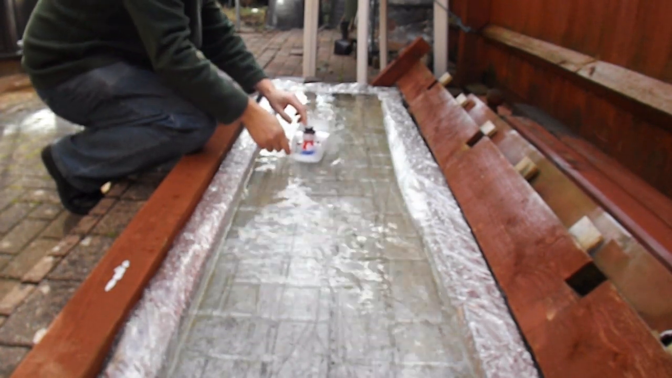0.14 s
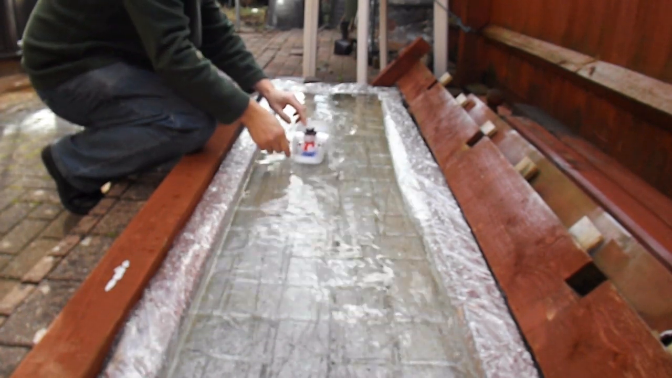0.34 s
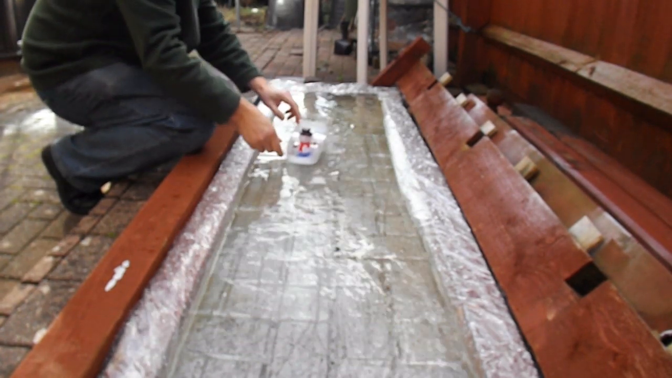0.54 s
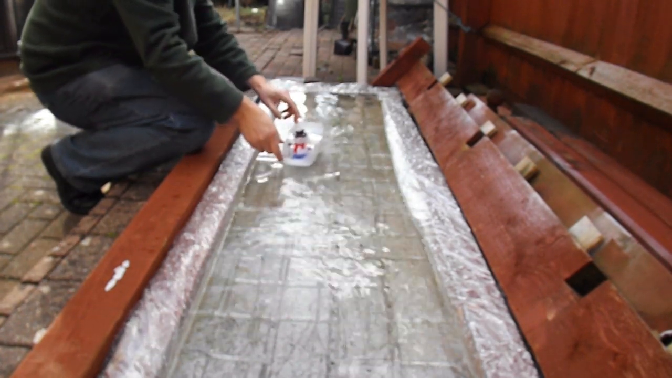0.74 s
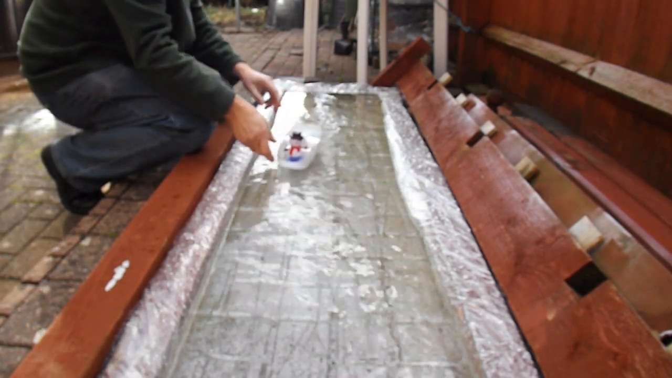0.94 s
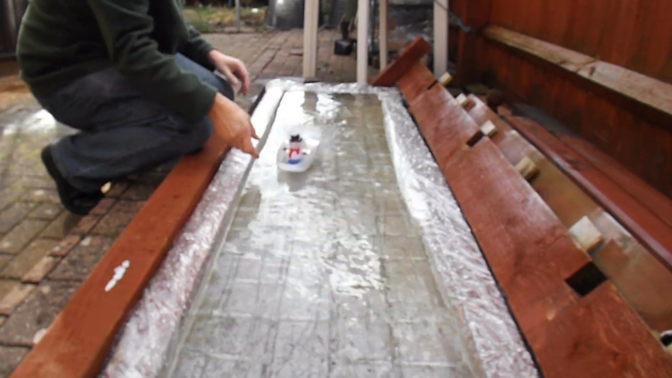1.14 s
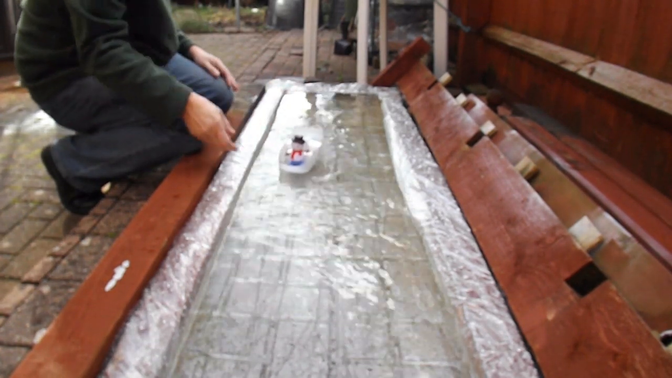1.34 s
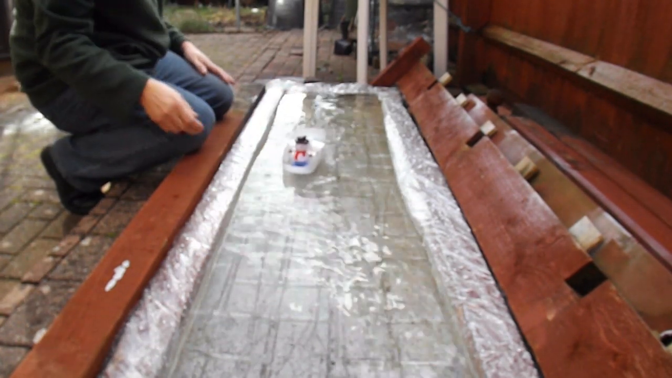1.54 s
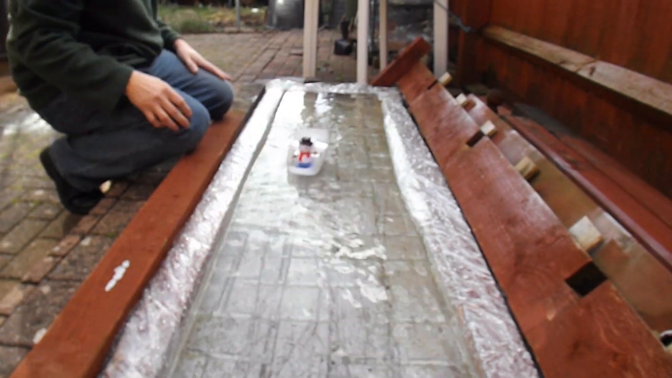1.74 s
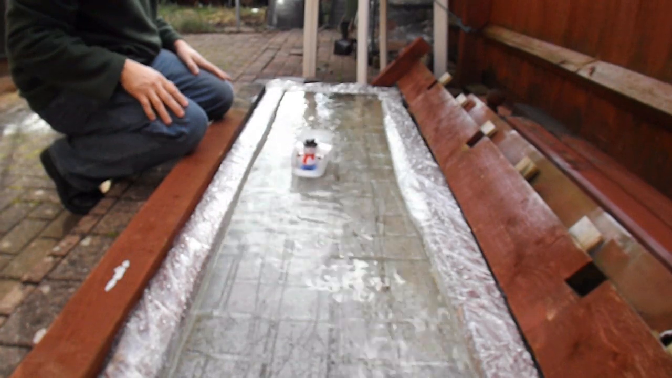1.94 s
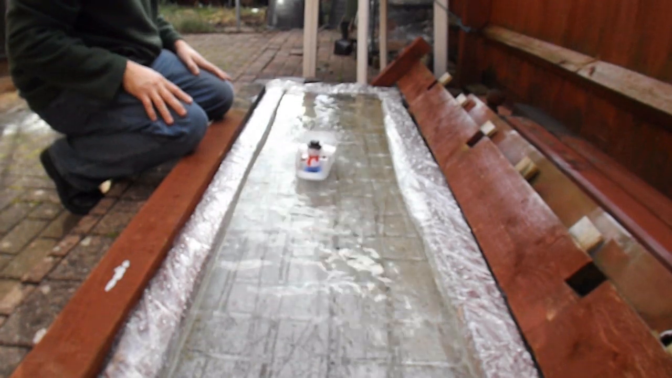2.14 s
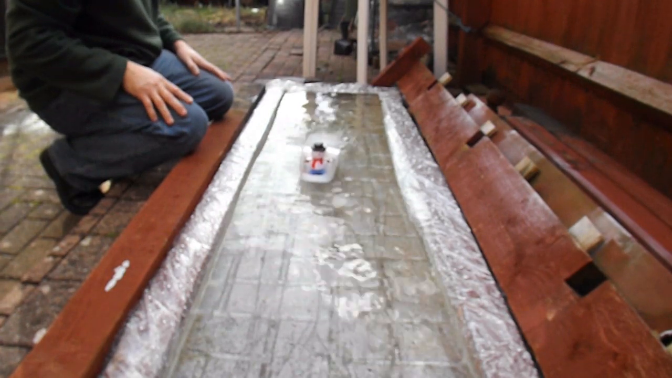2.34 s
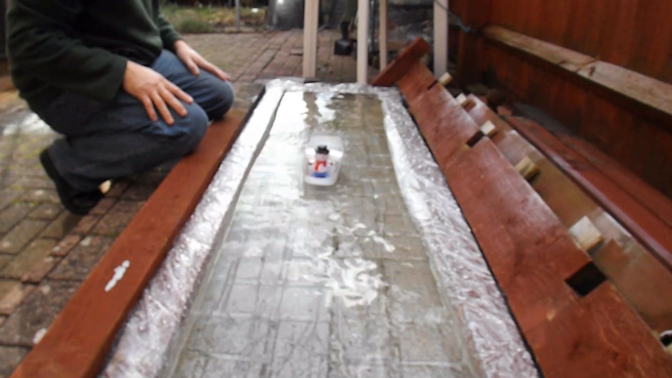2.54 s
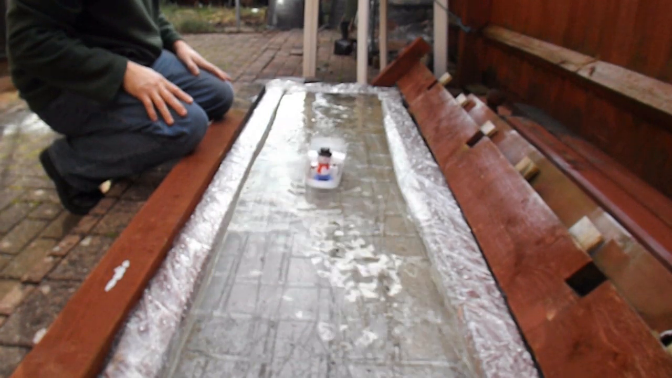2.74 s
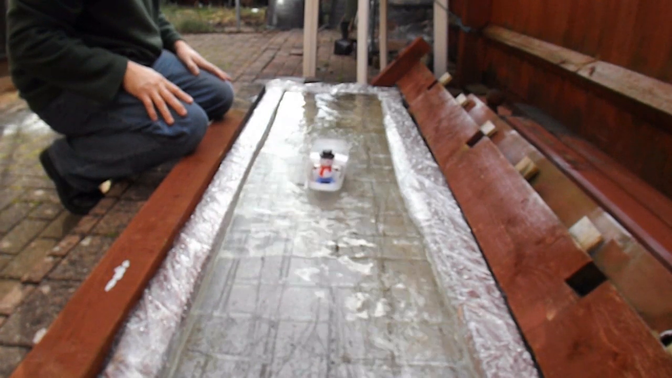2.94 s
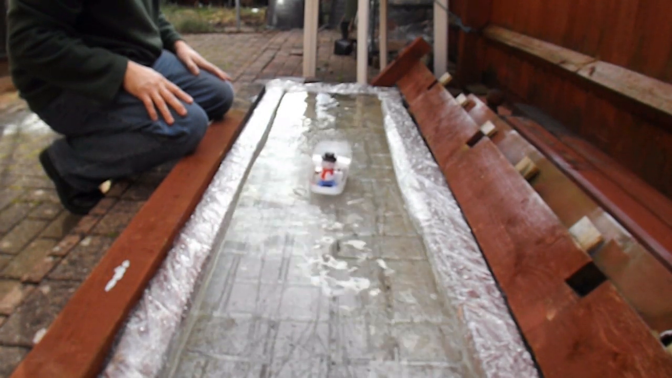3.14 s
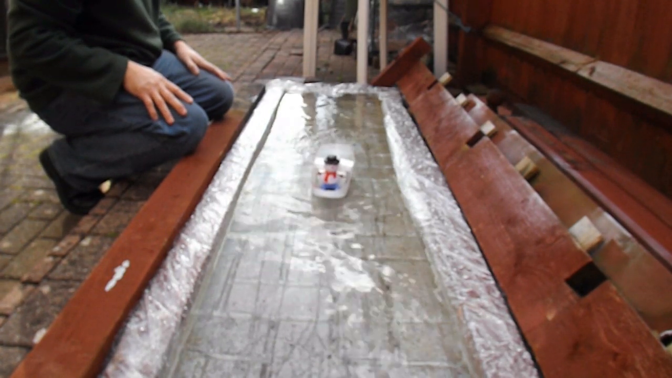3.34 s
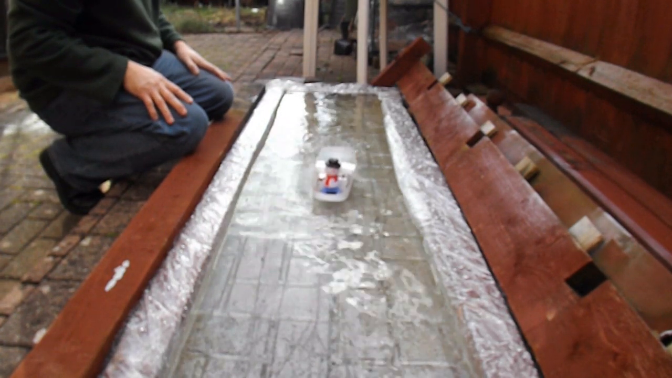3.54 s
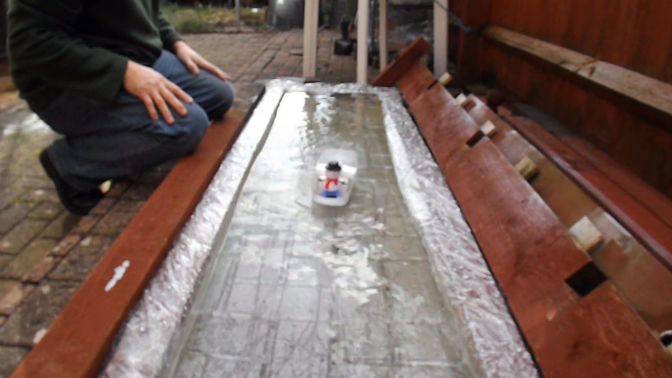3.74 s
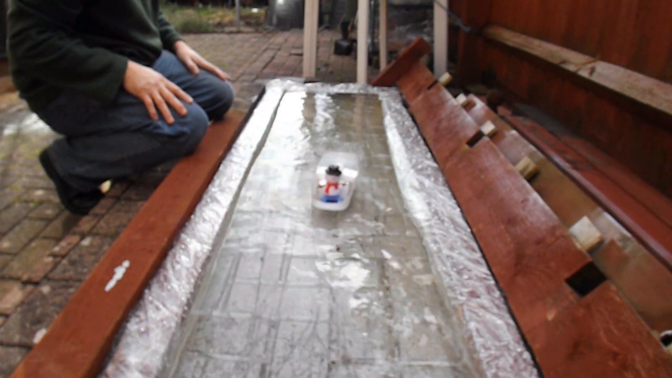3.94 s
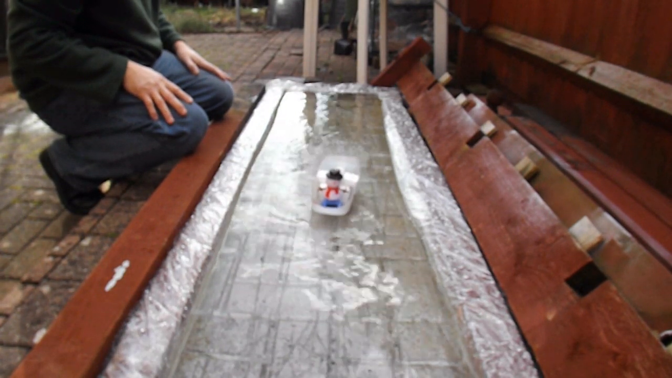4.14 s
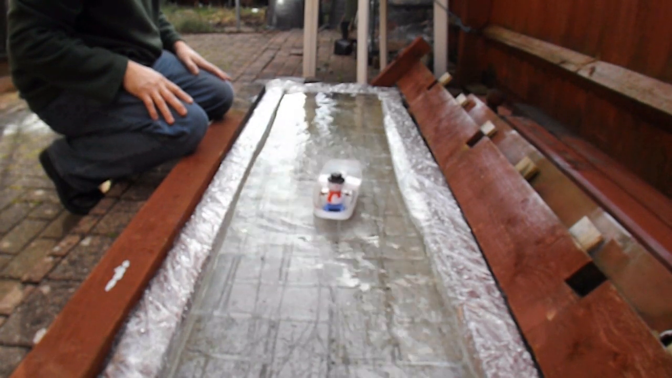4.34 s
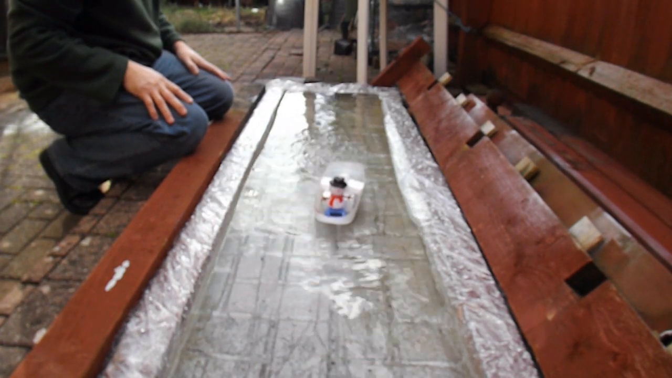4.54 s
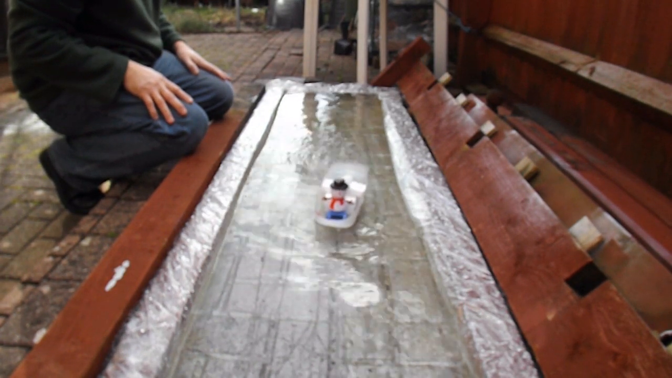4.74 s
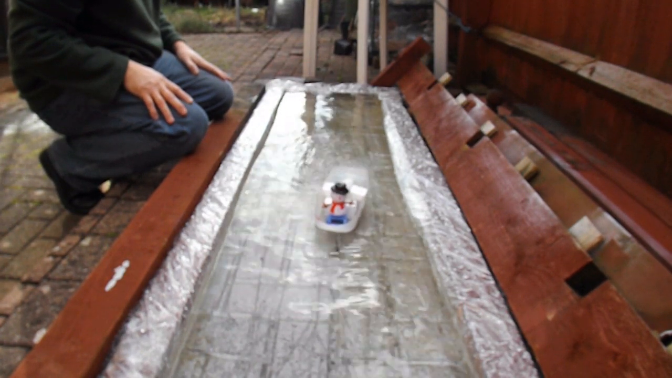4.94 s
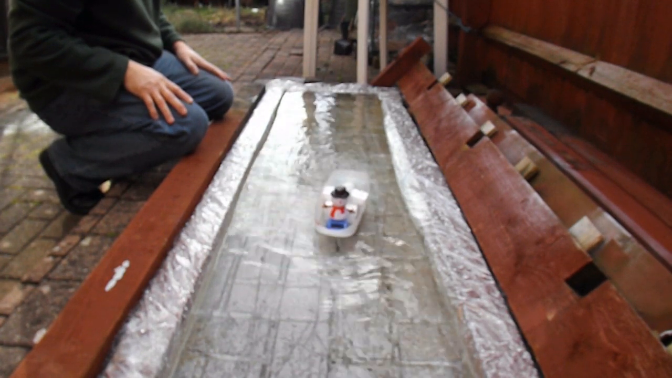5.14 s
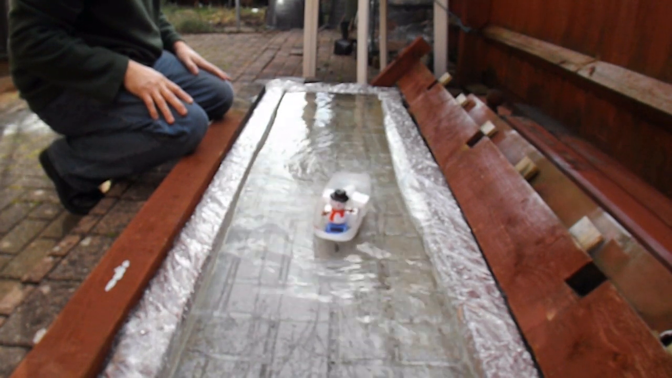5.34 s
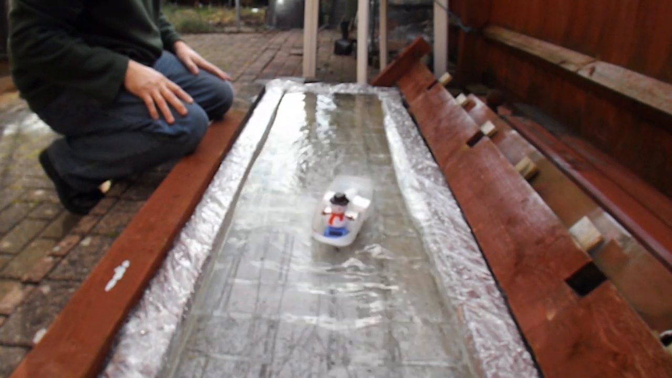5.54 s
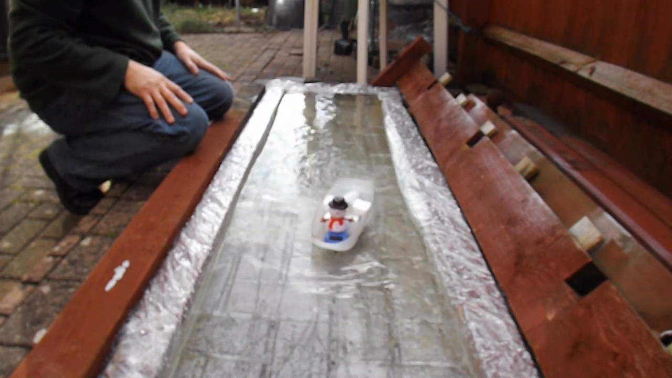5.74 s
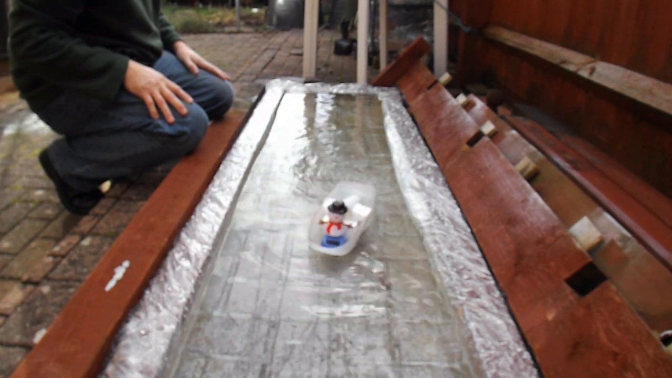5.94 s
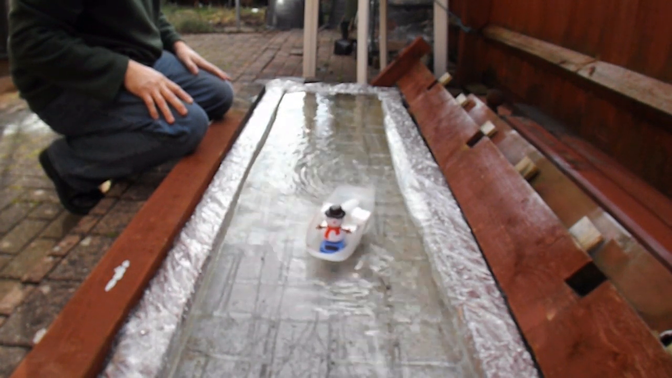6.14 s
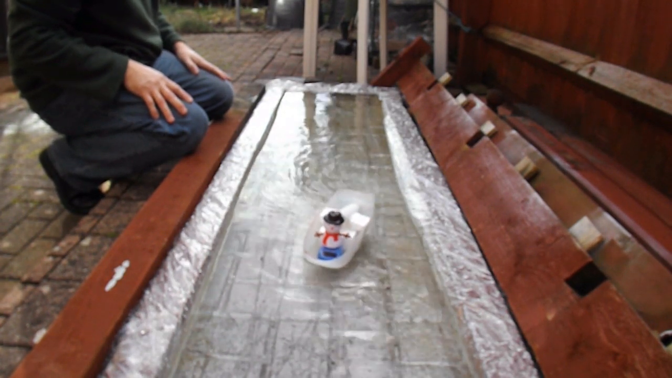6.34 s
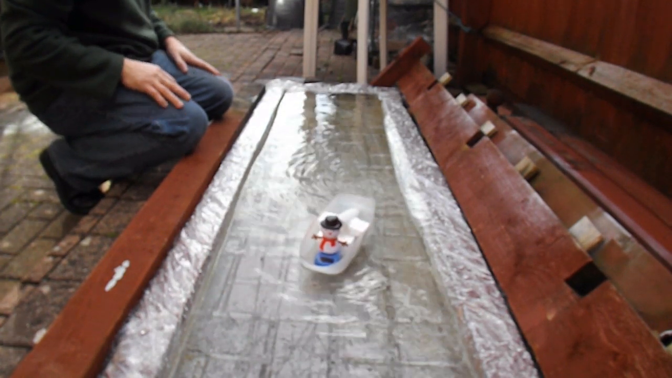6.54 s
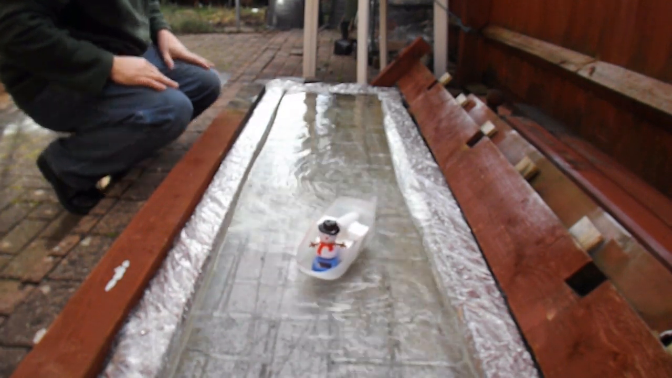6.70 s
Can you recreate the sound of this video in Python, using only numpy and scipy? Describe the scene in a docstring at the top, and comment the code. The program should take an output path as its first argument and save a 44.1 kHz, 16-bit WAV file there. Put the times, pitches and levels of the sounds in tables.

```python
"""A shallow outdoor trough, where an electric toothbrush drives a toy boat that slowly comes nearer.
Its drive knocks at both ends of each stroke: the hull hums at multiples of the stroke rate (additive tones),
its plastic clatters and rattles (clicks ringing many modes), and the shaken water fizzes (modulated noise).
Wind, made of turbulent noise and short pressure swings, buffets the microphone, then dies to a few soft puffs."""
import sys
import numpy as np
from scipy import signal
from scipy.fft import rfft, irfft
from scipy.io import wavfile

SR = 44100
rng = np.random.default_rng(int(sys.argv[2]) if len(sys.argv) > 2 else 0)


def generate_wav(signal):
    """Clip the signal to [-1, 1] and save it as 16-bit WAV at the path in sys.argv[1]."""
    frames = np.transpose(np.atleast_2d(signal))
    scaled = np.clip(frames, -1, 1) * 32767
    pcm = np.round(scaled).astype(np.int16)
    wavfile.write(sys.argv[1], SR, pcm)


N = 302967
TIME = np.arange(N) / SR  # seconds
BINS = np.fft.rfftfreq(N, 1 / SR)  # Hz


def amp(db):
    """Logarithmic level: decibels to gain."""
    return 10 ** (np.asarray(db) / 20)


def unit(x):
    """Normalisation: scales to rms 1."""
    return x / np.sqrt(np.mean(x ** 2) + 1e-20)


def curve(rows, axis=1):
    """Linear interpolation: one column of a time table at every sample."""
    rows = np.asarray(rows)
    return np.interp(TIME, rows[:, 0], rows[:, axis])


def read(points, hz):
    """Spectral envelope: interpolates a spectrum table on a log-frequency axis."""
    f, value = np.transpose(points)
    return np.interp(np.log(hz + 1), np.log(f + 1), value)


def colour(x, points):
    """Linear filtering: weights the spectrum of x by a table, then scales to rms 1."""
    return unit(irfft(rfft(x) * amp(read(points, BINS)), N))


def noise():
    """White noise: equal power at all frequencies."""
    return rng.standard_normal(N)


def drift(hz):
    """Low-passed noise: a slow random curve of rms 1, up to about hz."""
    return unit(irfft(rfft(noise()) * np.exp(-(BINS / hz) ** 2), N))


def held(start, length, ramp_s):
    """Trapezoidal envelope: rises to 1, holds and falls to 0, half way up at start and at start + length."""
    since_start = TIME - start
    until_end = start + length - TIME
    return np.clip(.5 + np.minimum(since_start, until_end) / ramp_s, 0, 1)


def scatter(x, ring_s):
    """Modal density: spreads each click over a dense, nearly colourless ring of many modes."""
    t = np.arange(2048) / SR
    ring = rfft(rng.standard_normal(len(t)) * np.exp(-t / ring_s))
    flattened = unit(irfft(ring / abs(ring) ** 0.84))
    return signal.oaconvolve(x, flattened / np.sqrt(len(t)))[:N]


# moments when extra load drags the drive down:
# start_s [s], length_s [s], speed_lost [strokes a second]
DRAGS = [(0.374, 0.13, 0.62), (0.6, 0.3, 2.3), (0.659, 0.14, 0.86), (1.742, 0.092, 0.94),
         (2.07, 0.14, 1.04), (2.619, 0.19, 1.05), (3.856, 0.056, 0.65), (4.469, 0.058, 1.01),
         (4.573, .17, 0.87), (4.93, 0.16, 0.27), (5.186, .21, 1.18), (6.148, 0.073, 0.22),
         (6.421, 0.19, 0.22)]


def drag(ramp_s=0.054):
    """Loading of a motor: strokes a second lost, with a ramp while the drive slows or recovers."""
    return sum(lost * held(start, length, ramp_s) for start, length, lost in DRAGS)


# speed of the drive under its usual load: time_s [s], speed [strokes a second]
USUAL_SPEED = [(0, 88.5), (.17, 90.4), (.33, 90.6), (1.01, 90.8), (1.08, 89.6), (1.32, 89.6), (1.46, 89),
               (1.6, 89.15), (1.75, 88.5), (2.05, 88.5), (2.33, 88.9), (2.6, 88.8), (2.8, 89.7),
               (3.05, 88.95), (3.56, 89.55), (3.89, 88.7), (4.11, 90.1), (4.36, 89.45), (4.87, 89.55),
               (5.15, 89.25), (5.46, 89.65), (5.6, 89.25), (6.19, 89.4), (6.37, 89.9), (6.87, 89.7)]


def speed():
    """Rate of the periodic source: the usual strokes a second, less every drag."""
    return curve(USUAL_SPEED) - drag()


def strain(free_hz=89.0, sag_hz=4.0):
    """Load read from speed: 0 when the drive runs freely, 1 when the load has slowed it by sag_hz."""
    return np.clip((free_hz - speed()) / sag_hz, 0, 1)


# growth of the hull's sound as the boat floats free and nears: time_s [s], gain_db [dB]
NEARNESS = [(0, -7), (1.5, -7), (2.3, -6), (2.9, -4), (4.2, -4), (5.5, -3.5), (6.87, -1)]


def nearness_db():
    """Level against distance: the gain rises as the boat comes nearer."""
    return curve(NEARNESS)


# one tone of hull or casing rings out or drops away for a while as the boat rocks:
# start_s [s], length_s [s], order [multiple of the stroke rate], level_db [dB, before any wander]
SWELLS = [(0.05, 0.19, 21, -43), (.1, 0.66, 17, -50.5), (0.267, 0.25, 21, -40.5), (0.472, 0.13, 24, -49.5),
          (.52, .14, 22, -47.5), (0.708, 0.26, 11, -45.5), (0.754, 0.18, 21, -42), (.88, 0.99, 22, -49.5),
          (1.33, 0.14, 17, -48), (1.368, 0.63, 11, -49.5), (1.617, 0.54, 17, -47.5), (2.033, 0.34, 11, -44),
          (2.276, 0.31, 11, -46.5), (2.47, 0.54, 21, -46), (2.59, 0.23, 11, -45), (2.6, .85, 19, -50.5),
          (2.619, 0.15, 45, -48), (2.786, 1.4, 22, -45.5), (2.798, 0.48, 55, -55), (3.44, 0.49, 54, -51),
          (3.48, 0.43, 17, -47.5), (3.579, 0.47, 11, -48), (3.791, 1.1, 16, -51.5), (4.053, 0.74, 22, -45),
          (4.062, 0.51, 21, -46), (4.342, 1.4, 24, -50), (5, 1.02, 22, -45), (5.45, 1.3, 62, -54.5),
          (5.001, 1.31, 14, -52), (5.15, 1.115, 43, -52), (5.15, 0.84, 45, -55), (5.799, 1.034, 12, -52),
          (5.248, 0.17, 24, -45.5), (5.384, 1.89, 17, -45), (5.45, 0.92, 54, -54), (6.03, .21, 16, -51),
          (6.248, 0.72, 21, -44), (6.25, 0.75, 41, -51), (6.25, 0.57, 22, -61.5), (6.25, 0.63, 19, -74),
          (6.299, 0.68, 7, -55), (6.3, .76, 9, -50.5)]


def swelled(order, db, wander_db):
    """Selective resonance: one tone's level is replaced by that of its swells while they last."""
    for start, length, swelling_order, swell_db in SWELLS:
        if swelling_order == order:
            db = db + held(start, length, ramp_s=.07) * (swell_db + wander_db - db)
    return db


def tones(turns, partials, phase_spread):
    """Harmonic series: multiples of the stroke rate, each starting at a random phase."""
    out = np.zeros(N)
    for order, db in partials:
        phase = phase_spread * rng.standard_normal()  # radians
        out += amp(db) * np.cos(2 * np.pi * order * turns + phase)
    return np.sqrt(2) * out  # each level is an rms level


# the hull's usual tones: order [multiple of the stroke rate], level_db [dB, before nearness and strain]
HUM = [(4, -61.5), (6, -50.5), (7, -46), (8, -60), (9, -53.5), (10, -54.5), (11, -56), (12, -55.5),
       (14, -57), (15, -60), (16, -55.5), (17, -49), (18, -54.5), (19, -50), (20, -52), (21, -48.5),
       (22, -47.5), (23, -57), (24, -51.5), (25, -54), (26, -60)]


def hull_hum(turns, wander_db=2.5, ringing_wander_db=1.0, flutter=0.053, strained_db=4.0):
    """Forced vibration: low tones swell under strain and waver with rocking, less while one rings out."""
    near_db, partials = nearness_db(), []
    for order, usual_db in HUM:
        rocking = drift(6.9)
        db = usual_db + near_db + order / 20 * (wander_db * rocking + strained_db * strain())
        near_1khz = np.exp(-((order - 11) / 1.5) ** 2)
        ripple_db = 3 * near_1khz * (drift(25) - .5)  # ripples shake the tones near 1 kHz
        partials.append((order, swelled(order, db, ringing_wander_db * rocking) + ripple_db))
    hum = tones(turns, partials, phase_spread=2.5)
    return hum * (1 + flutter * (1 + strain()) * drift(46))


def knock(turns, jitter_s, uneven):
    """Impulse train: one band-limited click a stroke, each a little early or late, weak or strong."""
    at_s = np.interp(np.arange(1, int(turns[-1])), turns, TIME)
    late, size = rng.standard_normal((len(at_s), 2)).T
    at = (at_s + jitter_s * late) * SR
    taps = at.astype(int)[:, None] + np.arange(-8, 9)
    # a sinc places each click between samples
    clicks = np.sinc(taps - at[:, None]) * (1 + uneven * size)[:, None]
    return np.bincount(np.clip(taps, 0, N - 1).ravel(), clicks.ravel(), N)


def chatter(turns, spectrum, jitter_s, ring_s, loose, back_db, creep, dragged_rasp=0.35):
    """Impact and friction: out and back knocks ring the plastic; drag makes the contact rasp and slip."""
    out = np.zeros(N)
    # the contact moves this many radians a second for each stroke a second lost
    slip = 14.216 * np.cumsum(drag()) / SR
    for stroke, db in ((turns, 0), (turns + .5, back_db)):
        clicks = knock(stroke, jitter_s, uneven=0.064)
        contact = slip + creep * drift(7.1)
        one_seat = np.cos(contact) * scatter(clicks, ring_s)
        other_seat = np.sin(contact) * scatter(clicks, ring_s)
        out += amp(db) * (one_seat + other_seat)
    rasp = noise() * (.5 + np.exp(-(turns % 1) / 2.7))
    share = np.clip(loose + dragged_rasp * drag(), 0, .8)
    return np.sqrt(1 - share ** 2) * colour(out, spectrum) + share * colour(rasp, spectrum)


# level of the knocks, which dips briefly around the hardest early buffets: time_s [s], clatter_db [dB],
# rattle_db [dB], both before wavering
KNOCKS = [(0, -54, -51), (.09, -43, -40.5), (.27, -47, -44), (.33, -41.5, -39.5), (.55, -45.5, -40),
          (.72, -46, -38.5), (.9, -41.5, -40.5), (1.08, -45, -41.5), (1.7, -43, -41), (2.41, -45.5, -40.5),
          (2.62, -42, -38.5), (3.26, -45, -42), (3.55, -41, -39.5), (4.05, -43.5, -41), (4.46, -40, -39),
          (4.92, -44.5, -42.5), (5.24, -41, -39), (5.55, -42.5, -41), (6.7, -41, -38)]
# colour of the hull's clatter: frequency_hz [Hz], relative_level_db [dB]
CLATTER = [(1900, -23), (2350, -4.5), (2750, -2.5), (3150, -10.5), (3550, -1), (4050, 1.5), (4450, -7),
           (4800, -1), (5200, -5), (5800, 0), (6300, -10), (7000, -80)]
# colour of the bright rattle: frequency_hz [Hz], relative_level_db [dB]
RATTLE = [(5400, -49), (6100, -2.5), (6600, -3), (6950, 1), (7300, -3), (7750, -2), (8300, -2.5),
          (9000, -10.5), (10000, -15), (12000, -25.5), (15500, -50)]


def clatter_and_rattle(turns, flicker_db=0.6):
    """Impact excitation: each knock rings the hull, and a looser, brighter rattle that also flutters."""
    clatter = chatter(turns, CLATTER, jitter_s=.000003, ring_s=.0042, loose=.04, back_db=-5, creep=.7)
    rattle = chatter(turns, RATTLE, jitter_s=.00001, ring_s=.005, loose=.18, back_db=-3.5, creep=1.1)
    rattle_db = curve(KNOCKS, axis=2) + flicker_db * drift(35)
    return amp(curve(KNOCKS)) * clatter + amp(rattle_db) * rattle


def resonate(x, hz, width_hz):
    """Resonance by heterodyning: shifts the curve hz to zero, low-passes, and shifts back."""
    turn = np.exp(2j * np.pi * np.cumsum(hz) / SR)
    r = np.exp(-np.pi * width_hz / SR)
    return 2 * (turn * signal.lfilter([1 - r], [1, -r], x / turn)).real


# the casing's brightest resonance, which slides as it shifts in its mount:
# time_s [s], centre_hz [Hz, before wobble], relative_level_db [dB]
SIZZLE = [(0.05, 7600, -49), (0.1, 7560, -55), (0.26, 7600, -50), (0.37, 7460, -44.5), (1.1, 7500, -41),
          (2.5, 7490, -42.5), (2.6, 7543, -36.5), (3.16, 7330, -39), (4.27, 7427, -37), (4.73, 7500, -40.5),
          (6.35, 7620, -37.5), (6.67, 7750, -35), (6.82, 7540, -40)]


def sizzle(turns, level_db=-1.5, width_hz=500, wobble_hz=130, flicker_db=0.9):
    """Moving resonance: loose chatter sings in one bright casing mode that slides, wobbles and flickers."""
    centre = curve(SIZZLE) + wobble_hz * drift(9.4)
    db = curve(SIZZLE, axis=2) + level_db + flicker_db * drift(8.1)
    rasp = chatter(turns, RATTLE, jitter_s=.000008, ring_s=.005, loose=.4, back_db=-3, creep=1.4)
    once = resonate(rasp, centre, width_hz)
    return amp(db) * unit(resonate(once, centre, width_hz))


# thin whine of the casing: order [multiple of the stroke rate], relative_level_db [dB]
WHINE = [(38, -59), (39, -58), (40, -61.5), (41, -79), (43, -65), (45, -59), (46, -60), (54, -66),
         (55, -68), (62, -55.5), (74, -52.5), (75, -59)]


def whine(turns, wander_db=2.0, level_db=1.5, damped_db=5):
    """Damped harmonics: high casing tones trade places as it shifts in its mount; strain damps them."""
    near_db = nearness_db() + level_db - damped_db * strain()
    partials = [(order, swelled(order, db + near_db, 0) + wander_db * drift(13.0)) for order, db in WHINE]
    return tones(turns, partials, phase_spread=2.2)


# colour of the water stirred by the hull: frequency_hz [Hz], relative_level_db [dB]
WATER = [(200, -48), (450, -8), (650, -2), (1000, 2.5), (1400, -2.5), (2100, -2.5), (2800, -14), (5000, -5),
         (10000, -31.5)]


def water(turns, level_db=-45.5, churn=0.034):
    """Amplitude-modulated noise: ripples and tiny splashes thrown up in time with the stroke."""
    lapping_db = .6 * drift(8)
    stir_db = lapping_db + 0.015 * nearness_db() + 4.9 * strain()
    stir = (1 + churn * np.cos(2 * np.pi * turns)) * amp(stir_db)
    return amp(level_db) * colour(noise() * stir, WATER)


# the breeze, which drops suddenly and then dies away: time_s [s], relative_level_db [dB]
BREEZE_FORCE = [(0, -40.5), (1.36, -37.5), (1.47, -63), (4.3, -74), (6.87, -112)]
# gusts on top of the breeze: peak_s [s], relative_level_db [dB], half_length_s [s, to 1/e]
GUSTS = [(0.27, -38.5, 0.031), (0.786, -39, 0.092), (1.153, -36.5, 0.15), (1.32, -45, 0.1),
         (1.538, -45.5, 0.031), (1.767, -62, 0.028), (2.065, -59, 0.023), (2.455, -61, 0.12),
         (2.734, -48, 0.054), (3.145, -57, 0.056), (3.497, -60, 0.013), (3.88, -60, 0.024),
         (4.078, -59, 0.059)]


def wind_force():
    """Superposition: the breeze plus a bell-shaped swell for each gust, as a gain."""
    swells = sum(amp(db) * np.exp(-((TIME - s) / half_s) ** 2) for s, db, half_s in GUSTS)
    return amp(curve(BREEZE_FORCE)) + swells


# colour of a light gust: frequency_hz [Hz], relative_level_db [dB]
LIGHT_GUST = [(20, -12), (60, -5.5), (120, -3.5), (220, -3.5), (350, -8.5), (600, -38), (1500, -52),
              (5000, -70)]
# colour of a strong gust: frequency_hz [Hz], relative_level_db [dB]
STRONG_GUST = [(20, -29), (70, -7), (160, 4), (350, 5), (600, -4), (1000, -8), (1600, -12), (3000, -27.5),
               (12000, -38)]


def wind(level_db=2.0, lumpy_db=6.5, strong_db=-33):
    """Turbulence noise: lumpy and brighter the harder it blows, until the air falls still."""
    db = 20 * np.log10(wind_force())
    strong = np.clip(1.5 + (db - strong_db) / 16, 0, 1)
    eddies = noise() * amp(lumpy_db * np.tanh(drift(116)))
    blend = (1 - strong) * colour(eddies, LIGHT_GUST) + strong * colour(eddies, STRONG_GUST)
    return amp(db + level_db) * blend


def small_eddies(above_db=0, spread_db=3, cycles=0.63, least_db=-45, count=280, per_s=37, middle_hz=520):
    """Poisson process: random rows like those of BUFFETS, as strong as the wind; light air makes none."""
    wait, size, pitch = rng.random((count, 3)).T
    times = np.cumsum(-np.log(1 - wait)) / per_s
    force_db = 20 * np.log10(np.interp(times, TIME, wind_force()))
    return [(s, db + above_db + spread_db * (2 * u - 1), middle_hz * 2 ** (v - .5), cycles)
            for s, db, u, v in zip(times, force_db, size, pitch) if db > least_db]


# the hardest eddies striking the microphone:
# time_s [s], relative_peak_db [dB], pitch_hz [Hz, at the centre], half_length [cycles]
BUFFETS = [(.006, -26, 600, 0.2), (.0575, -26, 556, 0.75), (.062, -32, 524, 1.2), (.121, -20, 510, 0.49),
           (.133, -33, 650, 0.49), (.183, -27, 350, 1.6), (.218, -25.5, 1300, 0.71),
           (.2185, -25.5, 300, 0.43), (.244, -41, 1200, .5), (.253, -25, 417, 2.4), (.266, -19, 766, 1.3),
           (.269, -14.5, 520, 0.62), (.2735, -35, 615, 1), (.2785, -16.5, 460, 1.7),
           (.34, -20.5, 360, 0.55), (.457, -29, 460, 0.39), (.544, -30, 597, 0.82),
           (.551, -21.5, 414, 1.15), (.629, -26, 357, 1.4), (.682, -26, 450, 0.57), (.696, -21, 507, 0.65),
           (.703, -26.5, 585, 2.4), (.712, -15.5, 557, 1.7), (.7185, -25, 620, 0.49),
           (.721, -15, 700, 0.55), (.735, -24, 600, 1.8), (.748, -26, 553, 1.4), (.777, -21.5, 437, 1.9),
           (.787, -20.5, 630, 2.1), (.793, -17, 555, 0.84), (.808, -20.5, 500, 0.43),
           (.884, -29, 1700, 0.45), (.9345, -21.5, 493, 0.38), (1.0105, -22.5, 647, 0.32),
           (1.0135, -17, 610, .6), (1.039, -25, 600, 1.2), (1.049, -25, 456, 1.7), (1.064, -18.5, 542, 1.2),
           (1.069, -15, 550, 1.7), (1.076, -23, 616, 1.5), (1.079, -14.5, 650, 0.91),
           (1.107, -9.5, 613, 1.1), (1.111, -16, 700, 1.6), (1.1165, -14, 767, 3.2), (1.121, -15, 750, .7),
           (1.128, -19, 450, 1.9), (1.133, -13, 616, 1.7), (1.1385, -11, 674, 1.6), (1.1455, -12, 560, 1.3),
           (1.151, -17, 640, 1.9), (1.156, -12, 650, 1.2), (1.1635, -11, 556, 1.6), (1.17, -11, 613, 0.43),
           (1.188, -17, 682, 2.04), (1.205, -16, 598, .7), (1.2115, -10, 597, 2.6),
           (1.227, -14.5, 490, 1.5), (1.267, -27, 423, 2), (1.293, -31, 421.5, 1.8),
           (1.299, -25, 2000, 0.31), (1.318, -12.5, 670, 0.78), (1.325, -24, 680, 1.1),
           (1.333, -17, 615, 1.8), (1.353, -18, 510, 2.1), (1.536, -42, 270, 1.8), (1.66, -35, 246.4, 0.95),
           (2.446, -33, 322, 0.74), (2.515, -42.5, 330, 1.4), (2.7315, -30, 475, 1.4),
           (2.7375, -24.5, 577, 0.6), (2.777, -38, 299.6, 0.73), (3.17, -48, 190, 1.2),
           (4.045, -47, 192, 0.91), (4.11, -45, 171, 1.4)]


def buffets(level_db=2.2, steep=.11, crack=.36):
    """Pressure transients: a few swings, uneven in pitch; the shortest eddies have the sharpest front."""
    out, t = np.zeros(N), np.arange(-882, 882) / SR
    front = np.tanh(t / .00007) * np.exp(-abs(t) / .00035)
    eddies = list(BUFFETS) + small_eddies()
    bends = rng.uniform(-0.2, 0.5, len(eddies))
    for (s, db, hz, cycles), bend in zip(eddies, bends):
        turns = hz * t * (1 + bend * np.tanh(hz * t))
        wave = np.sin(2 * np.pi * turns) + steep * np.sin(4 * np.pi * turns)
        swing = wave * np.exp(-abs(turns / cycles) ** 1.4)
        eddy = amp(db + level_db) * (swing + crack / cycles * front)
        out += np.interp(TIME, s + t, eddy, 0, 0)
    return out


def reflections(treble):
    """Diffuse reflection: faint scattered echoes of the treble, independent on each side."""
    return amp(-19.5) * np.array([scatter(treble, ring_s=0.079) for side in range(2)])


# colour of the still air of the yard: frequency_hz [Hz], relative_level_db [dB]
YARD = [(20, -16), (60, -8), (150, 0.5), (400, 5.5), (1000, -6), (3000, 4), (15000, -18)]


def yard_air():
    """Ambient noise floor: steady coloured noise."""
    return amp(-54.5) * colour(noise(), YARD)


def whistle():
    """Pure tone: a thin, steady high sine."""
    return amp(-60.5) * np.sin(2 * np.pi * 9779 * TIME)


def stereo_delay(x, left_lag_s=.000022, bass_hz=480):
    """Stereo delay: the left channel lags by about one sample in the treble; the bass stays nearly centred."""
    lag_s = left_lag_s * (1 - np.exp(-BINS / bass_hz))
    half = np.exp(1j * np.pi * BINS * lag_s)  # half the lag each way
    return irfft(rfft(x) * np.array([half.conj(), half]), N)


def scene():
    """Superposition of sources: boat, water and yard in front; wind right at the microphone."""
    turns = np.cumsum(speed() * (1 + 0.00054 * drift(40.6))) / SR  # strokes so far
    knocks = clatter_and_rattle(turns) + sizzle(turns)
    bobbing_db = 0.88 * drift(11.4)  # the force wavers as the hull bobs
    treble = knocks * amp(bobbing_db) + whine(turns)
    body = hull_hum(turns) + water(turns)
    air = yard_air() + whistle() + wind() + buffets()
    return stereo_delay(body + treble + air) + reflections(treble)


def record(dry, threshold_db=-26, squeeze=0.18, recovery_db=120, notch_hz=7000, edge_hz=15720):
    """Compression keyed to low rumble ducks all after a hard buffet; then a notch and a band limit."""
    rumble = signal.sosfilt(signal.butter(2, 1200, fs=SR, output="sos"), dry)
    peak_db = 20 * np.log10(abs(rumble).max(0) + 1e-9)
    fall = recovery_db * TIME  # recovery in dB a second
    held_peak_db = np.maximum.accumulate(peak_db + fall) - fall
    over_db = np.maximum(held_peak_db - threshold_db, 0)
    ducked = dry * amp(-squeeze * signal.lfilter([.01], [1, -.99], over_db))
    notched = signal.lfilter(*signal.iirnotch(notch_hz, 120, SR), ducked)
    band_limit = signal.firwin(2047, edge_hz, window=("kaiser", 9), fs=SR)
    return signal.oaconvolve(notched, band_limit[None], "same")


dry = scene()
out = record(dry)
generate_wav(out)
```